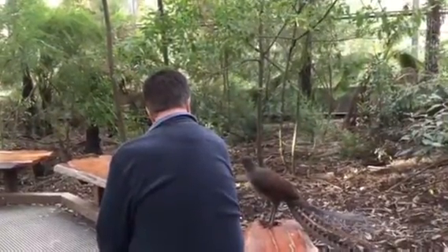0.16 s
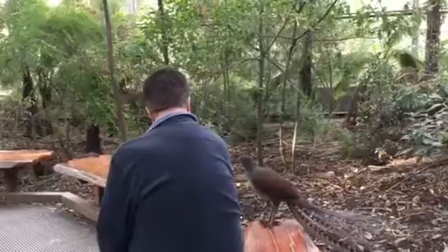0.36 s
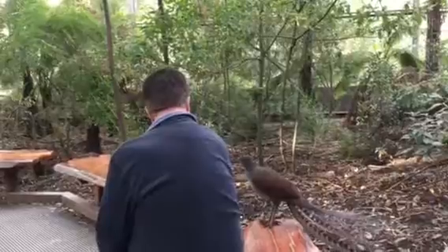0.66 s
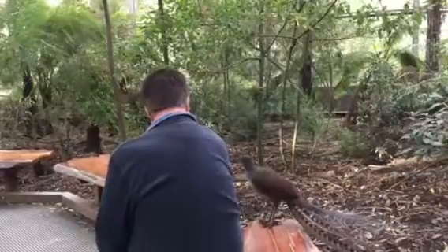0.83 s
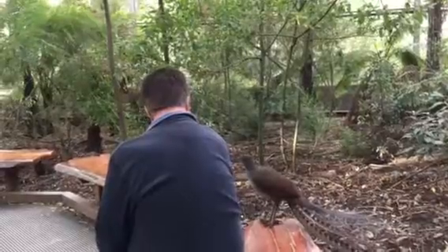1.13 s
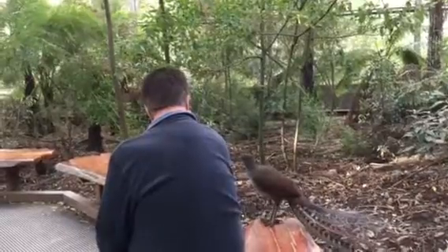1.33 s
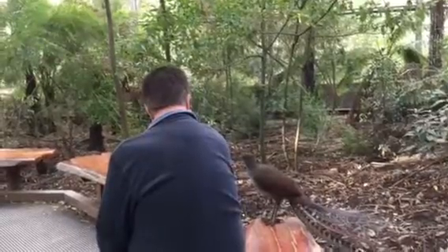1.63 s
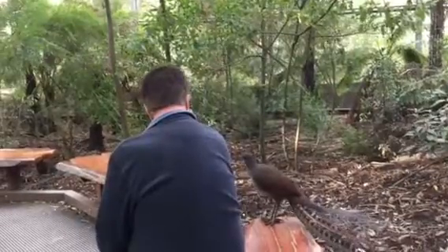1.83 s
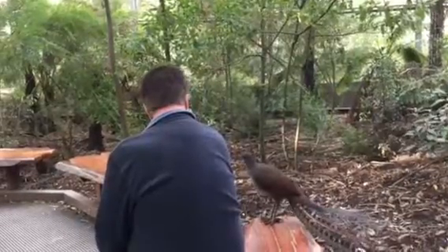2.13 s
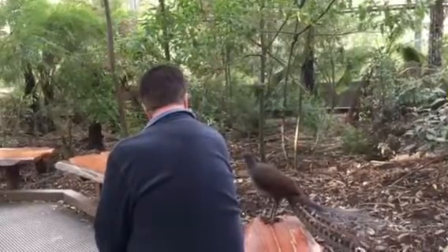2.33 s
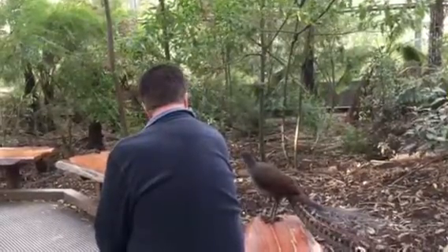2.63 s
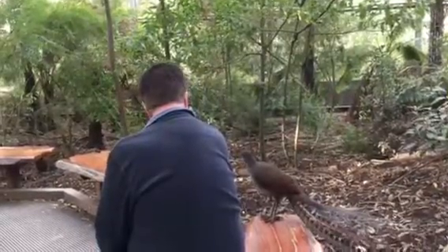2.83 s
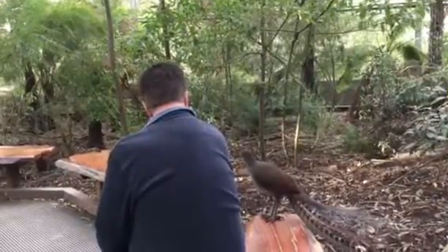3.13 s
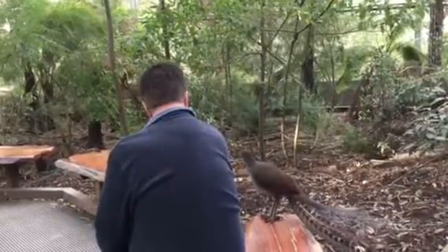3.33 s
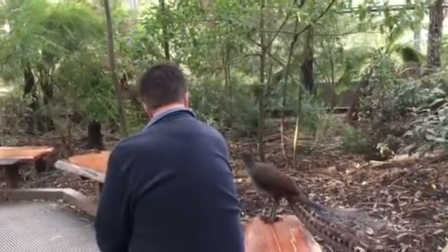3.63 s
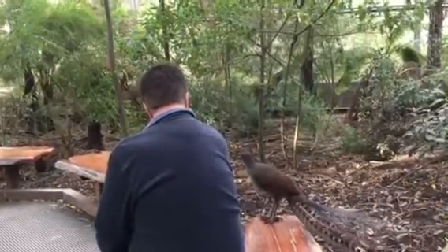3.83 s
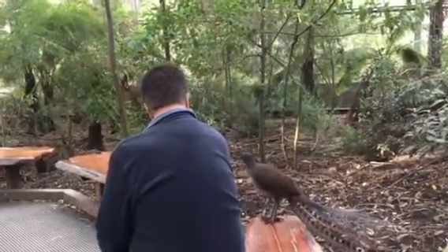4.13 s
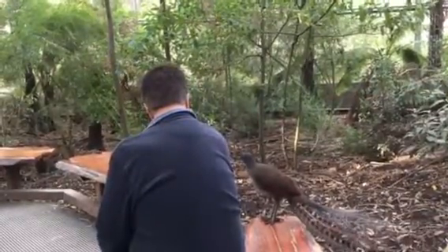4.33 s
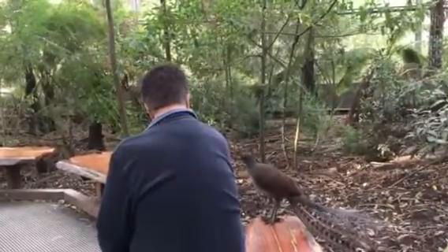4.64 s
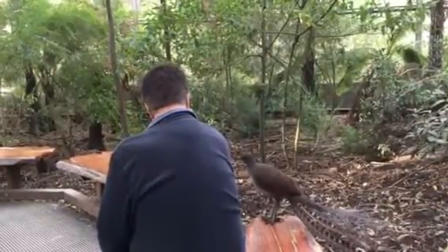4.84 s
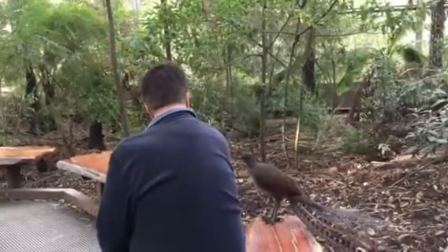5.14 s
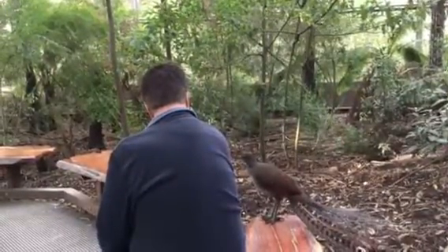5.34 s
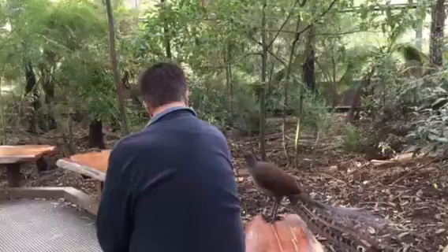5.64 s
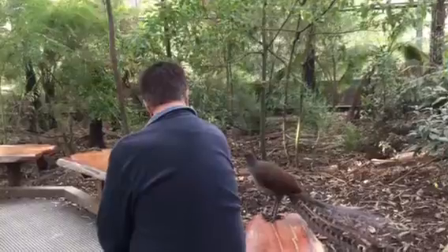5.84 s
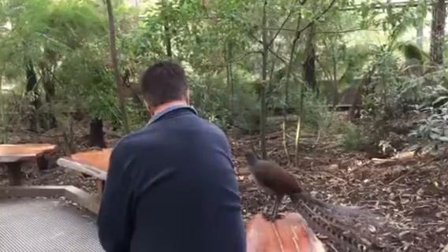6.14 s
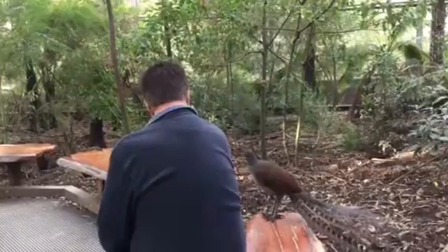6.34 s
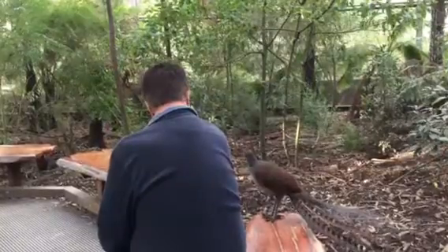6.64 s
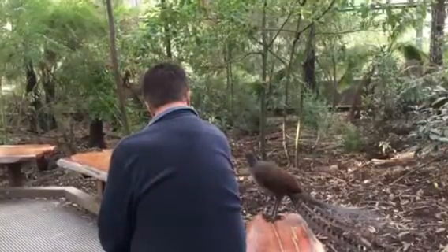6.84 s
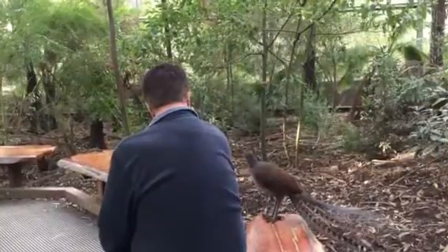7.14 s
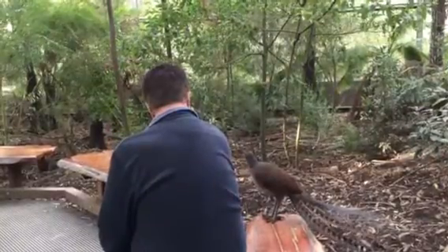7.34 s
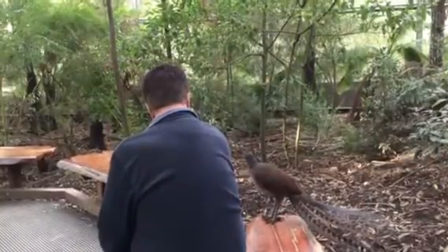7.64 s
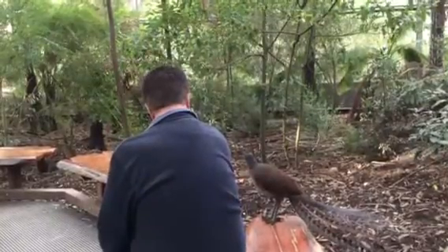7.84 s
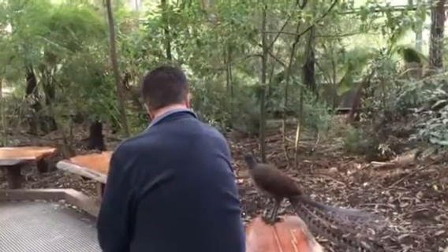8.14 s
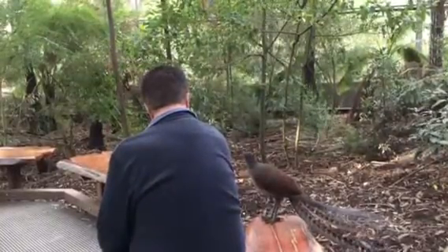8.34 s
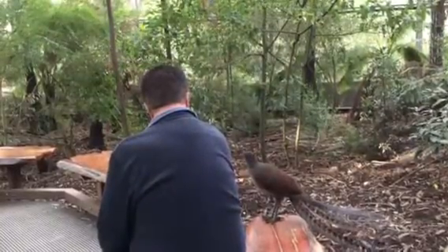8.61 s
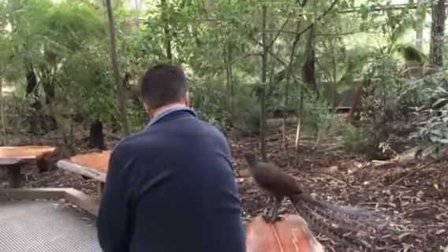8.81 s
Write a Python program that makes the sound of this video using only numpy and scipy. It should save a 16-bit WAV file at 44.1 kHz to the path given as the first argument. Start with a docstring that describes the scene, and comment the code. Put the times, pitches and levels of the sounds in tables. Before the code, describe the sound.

Close bird song of pure sliding whistles, reedy zips and clicking rattles, with distant chirps over soft outdoor rumble and a wavering hum.

```python
"""Leafy enclosure: a lyrebird sings a few metres away, other birds pipe and chirp further off.
The song is near-pure whistles (second harmonic of the syrinx), reedy glides and chucks (harmonics
through a fixed throat) and dry rattles (clicks that ring the throat).
Near reflections and a short dense tail give the echo; shaped noise and a wavering hum lie beneath."""
import sys
import numpy as np
from scipy import signal
from scipy.fft import rfft, irfft, next_fast_len
from scipy.io import wavfile
from scipy.ndimage import uniform_filter1d, map_coordinates

SR = 44100
rng = np.random.default_rng(int(sys.argv[2]) if len(sys.argv) > 2 else 0)


def inscribe(sig):
    """Save sig as 16-bit PCM at rate SR to the path in sys.argv[1].

    A 1-D sig is mono; a 2-D sig holds one channel per row.
    Samples are clipped to [-1, 1] before scaling.
    """
    pcm = np.round(np.clip(np.atleast_2d(sig).T, -1, 1) * 32767)
    wavfile.write(sys.argv[1], SR, pcm.astype(np.int16))


N = 395577
T = np.arange(N) / SR
TOP_HZ = 15300  # upper limit of harmonics and output

# throat and beak colour: (frequency [Hz], gain [dB])
THROAT_COLOUR = [(300, 3), (700, -5), (1050, 4), (1450, 6.5), (2100, -9), (3000, -14), (4300, -29.5),
                 (5400, -29), (6500, -39.5), (10000, -49), (15000, -62)]
# spectrum of the rasp noise: (frequency [Hz], relative level [dB])
RASP_COLOUR = [(2500, -26), (3800, 1.5), (4900, 7), (6000, -8.5), (7500, -2.5), (9400, -4), (12000, -8.5),
               (15000, -14)]


def undb(db):
    """Decibels to gain."""
    return 10 ** (np.asarray(db) / 20)


def unit(x):
    """Scale to rms 1."""
    return x / np.sqrt(np.mean(x ** 2))


def colour(hz, points):
    """Gain of a (Hz, dB) spectrum, interpolated over log frequency."""
    f, db = np.transpose(points)
    return undb(np.interp(np.log(np.maximum(hz, 1)), np.log(f), db))


def shape(x, points):
    """Filter a sound by a (Hz, dB) spectrum."""
    size = next_fast_len(len(x))
    gain = colour(np.fft.rfftfreq(size, 1 / SR), points)
    return irfft(rfft(x, size) * gain, size)[:len(x)]


def walk(n, rate_hz):
    """Smooth random wander through rate_hz new values per second, spread near 1."""
    steps = np.arange(n) * rate_hz / SR
    values = rng.standard_normal(int(steps[-1]) + 3)
    return map_coordinates(values, [steps], order=2, mode="nearest")


def add(out, start_s, x):
    """Mix a sound in at a time."""
    i = max(int(start_s * SR), 0)
    out[i:i + len(x)] += x[:max(N - i, 0)]


def contour(rows, jitter, shimmer_db, glide_s=0.0033, jitter_hz=300):
    """Pitch and strength of one note: rounded by the muscles' inertia, a little unsteady."""
    s, hz, db = np.transpose(rows)
    t = np.arange(s[0], max(s[-1], s[0] + 0.01), 1 / SR)
    size = max(int(glide_s * SR), 1)
    rounded_hz = uniform_filter1d(np.interp(t, s, hz), size)
    pitch_hz = rounded_hz * (1 + jitter * walk(len(t), jitter_hz))
    edges = np.clip(np.minimum(t - t[0], t[-1] - t) / 0.0015, 0, 1)  # 1.5 ms fades
    return pitch_hz, edges * undb(np.interp(t, s, db) + shimmer_db * walk(len(t), 118.5))


def partials(pitch_hz, throat, tilt_db=0, count=20):
    """Harmonic waves of a pitch, and their gains from throat colour and tilt (dB per octave)."""
    k = np.arange(1, count + 1)[:, None]
    hz = k * pitch_hz
    waves = np.sqrt(2) * np.sin(2 * np.pi * k * np.cumsum(pitch_hz) / SR)
    return waves, colour(hz, throat) * undb(tilt_db * np.log2(k)) * (hz < TOP_HZ)


def reed(pitch_hz, throat, tilt_db=0):
    """A full harmonic voice through a fixed throat, held near rms 1."""
    waves, gains = partials(pitch_hz, throat, tilt_db)
    return (waves * gains).sum(axis=0) / np.sqrt((gains ** 2).sum(axis=0))


def whistles(rasp_db=-33, slide_hz_per_s=9000, flicker_db=4, third_db=-3):
    """The throat follows the syrinx's second harmonic; the others leak out, and slides turn raspy."""
    # warbled whistles, one curve each: (time [s], pitch [Hz], level [dB])
    warble_curves = [
        [(0.01, 1174, -51), (0.024, 1320, -33), (0.038, 1180, -36.5), (0.06, 1465, -26.5), (0.078, 1772, -29.5),
         (0.094, 1977, -30), (0.118, 2047, -23), (0.132, 2076, -29), (0.15, 1952, -34.5), (0.172, 1546, -32),
         (0.188, 1446, -36), (0.204, 1422, -35.5), (0.218, 1532, -33.5), (0.232, 1740, -36), (0.248, 1873, -40),
         (0.316, 1692, -41), (0.335, 1526, -52)],
        [(0.478, 1150, -43), (0.486, 1182, -41), (0.496, 1047, -45), (0.504, 1229, -35), (0.532, 1620, -28.5),
         (0.544, 1767, -30.5), (0.556, 1778, -39), (0.568, 1977, -34.5), (0.588, 1823, -33.5),
         (0.612, 1430, -32), (0.628, 1353, -41), (0.642, 1460, -33.5), (0.676, 1802, -32), (0.7, 1812, -40),
         (0.718, 1787, -38), (0.766, 1670, -44), (0.775, 1520, -53)],
        [(1.078, 1590, -53), (1.086, 1606, -30.5), (1.096, 1634, -41), (1.102, 1700, -44.5),
         (1.164, 1720, -24.5), (1.188, 1709, -24.5), (1.196, 1640, -24.5), (1.208, 1440, -23.5),
         (1.232, 1205, -30), (1.25, 1118, -45), (1.266, 1357, -46), (1.274, 1342, -37), (1.284, 1726, -40),
         (1.292, 1820, -38), (1.304, 1606, -32), (1.314, 1376, -33.5), (1.325, 1385, -59)],
    ]
    # slow slurred whistles, one curve each: (time [s], pitch [Hz], level [dB])
    slur_curves = [
        [(2.742, 1115, -55), (2.762, 1207, -47), (2.794, 1302, -40.5), (2.888, 1406, -33.5), (3.048, 1687, -37),
         (3.096, 1707, -31.5), (3.114, 1753, -37), (3.144, 1939, -43.5), (3.172, 2262, -36), (3.264, 2445, -40),
         (3.36, 2350, -41), (3.448, 2205, -40.5), (3.508, 2012, -38), (3.572, 1886, -53.5), (3.592, 1820, -47),
         (3.604, 1930, -50), (3.64, 1619, -47), (3.648, 1630, -51)],
        [(7.262, 936, -41.5), (7.282, 1444, -46), (7.298, 1567, -41.5), (7.366, 2040, -48), (7.392, 2040, -36),
         (7.404, 2170, -45), (7.43, 2075, -49)],
    ]
    # whoops: (top time [s], rise [s], start pitch [Hz], top pitch [Hz], fall [octaves/s],
    # level before carry [dB], swell [dB], trill rate [Hz], trill depth [Hz])
    whoop_rows = [(7.445, .007, 3070, 2452, 16.7, -22.5, -15, 0, 0),
                  (8.214, .176, 1658, 2195, 23, -26.5, 32, 33, 193),
                  (8.475, 0.055, 980, 1647, 12, -26, -12, 83, 84),
                  (8.594, 0.0049, 2740, 2660, 17.6, -23.5, 6, 0, 10),
                  (8.975, 0.1, 1288, 1820, 16, -24, 46, 54.5, 90)]
    # leaking harmonics: (frequency [Hz], level against the whistle before trims [dB])
    leak_colour = [(600, -46.5), (850, -23), (1150, -20.5), (2600, -32), (3800, -50), (7300, -56.5),
                   (9400, -39.5), (11500, -46.5), (15000, -64)]
    # trims by kind: (harmonics 1 and 3 [dB], higher overtones and rasp [dB])
    warble_trim_db, slur_trim_db, whoop_trim_db = (0.5, -3), (2.5, -18), (-28, -12.5)
    edge_s, edge_db = 0.01, 2  # ease in and out

    notes = [(warble_trim_db, rows) for rows in warble_curves]
    notes += [(slur_trim_db, rows) for rows in slur_curves]
    notes += [(whoop_trim_db, whoop(*row)) for row in whoop_rows]
    tone, overtones = np.zeros(N), np.zeros(N)
    for (under_db, over_db), rows in notes:
        start_s = rows[0][0]
        pitch_hz, strength = contour(rows, jitter=0.0018, shimmer_db=1.16)
        n = len(pitch_hz)
        inside = np.minimum(np.minimum(T[:n], T[n - 1] - T[:n]) / edge_s, 1)
        strength = strength * undb(-edge_db * (1 - inside))

        slope_hz_per_s = np.abs(uniform_filter1d(np.gradient(pitch_hz), SR // 100)) * SR
        sliding = np.tanh(slope_hz_per_s / slide_hz_per_s)
        waves, gains = partials(pitch_hz / 2, leak_colour)  # waves[1] is the whistle
        leak = waves * gains
        upper = sum(partial * undb(flicker_db * walk(n, 40)) for partial in leak[3:])
        rasp = unit(shape(rng.standard_normal(n), RASP_COLOUR))
        rasp = rasp * sliding * undb(rasp_db + flicker_db * walk(n, 91))
        lower = leak[0] + undb(third_db) * leak[2]
        add(tone, start_s, strength * (waves[1] + undb(under_db) * lower))
        add(overtones, start_s, strength * undb(over_db) * (upper + rasp))
    return tone, overtones


def whoop(top_s, rise_s, start_hz, top_hz, fall_octaves_per_s, db, swell_db, trill_hz, depth_hz):
    """Rows of (s, Hz, dB): a pitch moves to its top, trilled or plain, then falls at a steady musical rate."""
    # how strongly a whoop carries at each pitch: (frequency [Hz], gain [dB])
    carry = [(880, -28), (1080, -16.5), (1300, -4.5), (1560, -0.5), (1850, -5.5), (2130, -5.5),
             (2450, -14.5), (3000, -22)]
    end_hz, swell_curve = 900, 4.3  # the swell changes fast at first, then levels off
    t = np.arange(-rise_s, np.log2(top_hz / end_hz) / fall_octaves_per_s, 1 / SR)
    risen = np.minimum(1 + t / rise_s, 1)
    trill = depth_hz * np.sin(np.pi * risen) * np.cos(2 * np.pi * trill_hz * (t + rise_s))
    hz = start_hz + (top_hz - start_hz) * risen - trill
    hz = hz * 2 ** (-fall_octaves_per_s * np.maximum(t, 0))
    level_db = db - swell_db * (1 - risen) ** swell_curve + 20 * np.log10(colour(hz, carry))
    return np.column_stack([top_s + t, hz, level_db])


def glides(rasp_db=-25, purity_db=7, pure_above_hz=1200):
    """Fast sweeps with the throat held still: harmonics pass through its resonance; bright ones rasp."""
    # long reedy cry: (time [s], pitch [Hz], level [dB])
    cry_curve = [(4.705, 2380, -66), (4.721, 1672, -50), (4.743, 1460, -45), (4.761, 1432, -41),
                 (4.779, 1630, -53), (4.817, 3560, -62), (4.853, 3910, -65), (4.909, 3512, -52.5),
                 (4.941, 3436, -81), (4.961, 2820, -53), (4.985, 1908, -56), (5.009, 1589, -41.5),
                 (5.067, 1267, -42), (5.11, 825.2, -45)]
    # zips, reedy pitch flips: (start [s], flip [s], end [s], flip time [s], from [Hz], to [Hz],
    # level before edges and flare [dB], brightness [dB/octave])
    zip_rows = [(1.79, 1.8, 1.872, 0.01, 2117, 1220, -57, 2.5),
                (6.095, 6.172, 6.265, 0.0057, 798, 2753, -42.5, -3.5),
                (6.351, 6.376, 6.392, 0.0041, 3450, 750, -42, -2),
                (6.543, 6.582, 6.6, 0.0044, 1026, 773, -41.5, -6.5),
                (6.616, 6.63, 6.637, 0.0045, 3705, 1040, -41, -2.5),
                (6.643, 6.66, 6.692, 0.0044, 854, 3860, -43, 0),
                (7.137, 7.186, 7.245, 0.0095, 3200, 725, -47.5, -0.5),
                (7.627, 7.65, 7.655, 0.0034, 3100, 1080, -40.5, -2),
                (7.972, 7.997, 8.02, 0.0042, 900, 581, -45.5, -2)]
    cry_tilt_db = 0.5  # per octave
    creak_s, creak_hz, creak_db = 0.1, 180, -49  # the cry runs down into a creak

    cry = [*cry_curve, (cry_curve[-1][0] + creak_s, creak_hz, creak_db)]
    notes = [(cry_tilt_db, cry)]
    notes += [(tilt_db, zip_note(*row)) for *row, tilt_db in zip_rows]
    out = np.zeros(N)
    for tilt_db, rows in notes:
        # uneven cycles blur the upper harmonics
        pitch_hz, strength = contour(rows, jitter=0.017, shimmer_db=1.5, glide_s=0.003, jitter_hz=1200)
        n = len(pitch_hz)
        # a tight, high syrinx swings almost as a sine
        tension = np.maximum(pitch_hz / pure_above_hz - 1, 0)
        voice = reed(pitch_hz, THROAT_COLOUR, tilt_db - purity_db * tension)
        rasp = unit(shape(rng.standard_normal(n), RASP_COLOUR))
        rasp = rasp * undb(rasp_db + 2 * tilt_db + 2.5 * walk(n, 112.6))
        add(out, rows[0][0], strength * (voice + rasp))
    return out


def zip_note(start_s, flip_s, end_s, flip_time_s, from_hz, to_hz, db):
    """Rows of (s, Hz, dB): an S-shaped pitch flip that flares as it crosses the throat's resonance."""
    waver, waver_hz = 0.025, 70  # pitch share, new values per s
    edge_share, edge_db = 0.38, 12.5  # swell and fade, share of the length
    peak_hz, peak_octaves, peak_db = 1410, 0.17, 12
    t = np.arange(start_s, end_s, 1 / SR)
    flipped = 0.5 + 0.5 * np.tanh((t - flip_s) / (2 * flip_time_s))
    hz = from_hz * (to_hz / from_hz) ** flipped
    hz = hz * (1 + waver * walk(len(t), waver_hz))
    opened = np.minimum(np.minimum(t - start_s, end_s - t) / (edge_share * (end_s - start_s)), 1)
    flare = np.exp(-(np.log2(hz / peak_hz) / peak_octaves) ** 2)
    return np.column_stack([t, hz, db - edge_db * (1 - opened) + peak_db * flare])


def chucks(low_hz=280, swell_db=15):
    """The syrinx starts as a slow buzz, flicks up to a pitch and drops back."""
    # (time of top [s], top pitch [Hz], level [dB], rise [s], fall [s], treble [dB/octave])
    chuck_rows = [(1.045, 1120, -45.5, 0.019, .012, 1), (1.058, 1605, -35, 0.0042, 0.0039, -3),
                  (2.475, 1174, -41.5, .012, 0.012, 0), (2.515, 1296, -36.5, 0.015, 0.0055, -4),
                  (2.564, 1404, -35, .015, 0.0054, -12), (2.602, 1250, -40, .016, 0.0072, -7),
                  (4.207, 1253, -47, .018, 0.0084, 3), (4.574, 1440, -38, .034, .024, 4),
                  (4.666, 1600, -39.5, 0.037, 0.014, 7.5), (6.084, 618, -42.5, 0.013, .03, -2.5)]
    out = np.zeros(N)
    for s, hz, db, rise_s, fall_s, tilt_db in chuck_rows:
        rows = [(s - rise_s, low_hz, db - swell_db),
                (s - rise_s / 3, hz / 2, db - swell_db / 2),
                (s, hz, db),
                (s + fall_s, low_hz, db - swell_db)]
        pitch_hz, strength = contour(rows, jitter=0.042, shimmer_db=0.5, jitter_hz=790)
        add(out, s - rise_s, strength * reed(pitch_hz, THROAT_COLOUR, tilt_db))
    return out


def rattles(gain_db=1, scatter_db=2.5, rasp=0.12, rasp_s=0.0053, onset_s=0.00033):
    """Single snaps of the syrinx ring the throat, each with a puff of rasp."""
    # runs of clicks: (start [s], clicks [count], spacing [s], peak before gain and scatter [dB])
    rattle_rows = [(2.0197, 1, 0, -38.5), (3.9569, 2, 0.024, -33), (4.5112, 1, 0, -43),
                   (5.1925, 6, 0.014, -38.5), (5.3877, 3, 0.0054, -38.5), (5.4338, 2, .0125, -40),
                   (5.613, 2, 0.0058, -39), (5.6616, 2, 0.017, -40.5)]
    # throat resonances before detuning: (frequency [Hz], t60 [s], relative level [dB])
    click_modes = [(1250, 0.0083, -9.5), (1600, 0.0036, 12), (2710, 0.0056, -3.5), (3800, 0.022, -18.5),
                   (5200, 0.0083, -10)]
    out, t = np.zeros(N), T[:SR // 25]
    hz, t60_s, db = np.transpose(click_modes)[:, :, None]
    for start_s, count, spacing_s, peak_db in rattle_rows:
        for k in range(round(count)):
            detune = 1 + 0.058 * rng.standard_normal(hz.shape)
            modes = undb(db - 60 * t / t60_s) * np.sin(2 * np.pi * hz * detune * t)
            ring = modes.sum(axis=0) * (1 - np.exp(-t / onset_s))
            snap = (t == 0) + rasp * rng.standard_normal(len(t)) * np.exp(-t / rasp_s)
            click = signal.fftconvolve(ring, snap)
            level_db = peak_db + gain_db + scatter_db * rng.standard_normal()
            add(out, start_s + k * spacing_s, click / np.abs(click).max() * undb(level_db))
    return out


def far_birds(chirp_gain_db=-1, flicker_db=1.0):
    """Nearly level piping notes rich in harmonics, and thin chirps with a scratchy edge."""
    # (start [s], length [s], pitch [Hz], fall [share of pitch], level [dB], brightness [dB/octave])
    pipe_rows = [(0, 0.077, 905, 0.039, -52.5, 7), (1.861, 0.18, 1129, 0.02, -56, 6),
                 (2.022, 0.38, 1131, 0.01, -62, 4.5), (3.323, .15, 992, 0.011, -58.5, 4.5),
                 (3.735, 0.274, 1132, 0.0116, -56.5, 3.5), (5.448, 0.3, 1069, -0.019, -57, 0.5),
                 (7.427, 0.18, 893, 0.038, -53.5, 2)]
    # pipers' throat: (frequency [Hz], gain [dB])
    pipe_throat = [(900, -8.5), (1100, 6), (2250, 2), (2800, -8.5), (3550, -7), (4600, -16.5),
                   (5700, -20.5), (6900, -24), (8500, -76)]
    # straight slides: (start [s], length [s], from [Hz], to [Hz], level before gain [dB], scratch [dB])
    chirp_rows = [(2.283, 0.043, 4020, 3520, -50.5, -1), (2.312, 0.12, 1995, 2170, -46, -1.5),
                  (2.336, .055, 5650, 5220, -48.5, -4), (2.38, 0.05, 4850, 3120, -52.5, 2.5),
                  (7.328, 0.19, 3740, 3670, -59.5, -5), (7.668, 0.021, 3930, 3530, -49, -4),
                  (7.868, 0.037, 3850, 3740, -47, -11), (7.909, 0.05, 4740, 5440, -54, 0),
                  (7.938, .04, 5120, 4660, -45.5, -18), (7.97, 0.0353, 4180, 3450, -42.5, -13),
                  (8.196, 0.1, 3805, 3800, -51.5, -14), (8.264, 0.047, 5470, 5170, -49, -6.5),
                  (8.308, 0.066, 4380, 3660, -49.5, -3.5)]
    pipe_edge_db, chirp_edge_db = 2, 11  # ends lie this far under the middle
    out = np.zeros(N)
    for s, length_s, hz, fall, db, tilt_db in pipe_rows:
        rows = [(s, hz * (1 + fall / 2), db - pipe_edge_db),
                (s + length_s / 2, hz, db),
                (s + length_s, hz * (1 - fall / 2), db - pipe_edge_db)]
        pitch_hz, strength = contour(rows, jitter=0.006, shimmer_db=2.5)
        waves, gains = partials(pitch_hz, pipe_throat, tilt_db, count=8)
        voice = sum(partial * undb(flicker_db * walk(len(pitch_hz), 36)) for partial in waves * gains)
        add(out, s, strength * unit(voice))
    for s, length_s, from_hz, to_hz, db, scratch_db in chirp_rows:
        rows = [(s, from_hz, db - chirp_edge_db),
                (s + length_s / 2, (from_hz + to_hz) / 2, db),
                (s + length_s, to_hz, db - chirp_edge_db)]
        pitch_hz, strength = contour(rows, jitter=0.01, shimmer_db=3, jitter_hz=700)
        # fast irregular beating spreads a band of noise around the tone
        scratch = 1 + undb(scratch_db) * walk(len(pitch_hz), 1300)
        tone = np.sin(2 * np.pi * np.cumsum(pitch_hz) / SR)
        add(out, s, undb(chirp_gain_db) * strength * scratch * tone)
    return out


def reflections(x):
    """Ground, bench and nearby trunks each return one weak copy."""
    # (delay [s], gain [linear])
    echo_rows = [(.0043, .2), (0.0114, 0.24), (.021, 0.15)]
    out = x.copy()
    for delay_s, gain in echo_rows:
        add(out, delay_s, gain * x)
    return out


def enclosure(x, t60_low_s=0.57, t60_high_s=0.28, build_s=0.0043, split_hz=6000):
    """Scatter from trunks, leaves and roof: a dense tail whose treble dies first."""
    t, noise = T[:SR], rng.standard_normal(SR)
    low = signal.sosfilt(signal.butter(2, split_hz, "low", fs=SR, output="sos"), noise)
    high = signal.sosfilt(signal.butter(2, split_hz, "high", fs=SR, output="sos"), noise)
    # the bands are in antiphase, so subtracting avoids a notch at the split
    tail = low * undb(-60 * t / t60_low_s) - high * undb(-60 * t / t60_high_s)
    tail = tail * (1 - np.exp(-t / build_s))
    return signal.fftconvolve(x, tail / np.sqrt(np.sum(tail ** 2)))[:N]


def background(air_db=-53, hum_gain_db=-1, hum_hz=64.9):
    """Soft outdoor rumble and hiss, with the wavering hum of a distant machine."""
    # noise spectrum: (frequency [Hz], relative density [dB])
    air_colour = [(25, -43), (45, -12.5), (70, -4), (165, -10), (250, -6.5), (430, -19), (1000, -22.5),
                  (1900, -26.5), (3200, -32), (6300, -40.5), (10000, -43.5), (15000, -49.5)]
    # hum: (time [s], level before gain [dB])
    hum_levels = [(0.0, -63), (0.87, -53), (1.5, -61.5), (4.32, -49.5), (4.92, -59), (8.97, -52.5)]
    air = unit(shape(rng.standard_normal(N), air_colour))
    air = air * undb(air_db + 0.85 * walk(N, 3.005))
    drone = np.sin(2 * np.pi * np.cumsum(hum_hz + 1.22 * walk(N, 5.7)) / SR)
    drone = unit(drone * undb(2.0 * walk(N, 9)))
    return air + drone * undb(np.interp(T, *np.transpose(hum_levels)) + hum_gain_db)


def scene():
    """The beak beams treble into the trees: notes above 2 kHz echo more than those near 1.6 kHz."""
    tone, overtones = whistles()
    song = tone + glides() + chucks() + rattles()
    far = far_birds()
    beamed = shape(song, [(700, -11.5), (1600, -18), (2300, -7.5), (3500, -9.0)])
    wet = enclosure(beamed + undb(-5.5) * overtones + undb(-1.0) * far)
    direct = song + undb(3.5) * overtones + undb(-1.5) * far
    return (reflections(direct) + wet + background())[None]


def record(dry):
    """Steep elliptic low-pass at TOP_HZ."""
    return signal.sosfilt(signal.ellip(10, 0.2, 80, TOP_HZ, fs=SR, output="sos"), dry)


dry = scene()
out = record(dry)
inscribe(out)
```